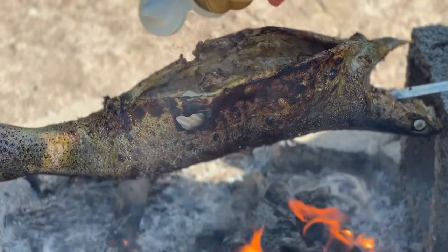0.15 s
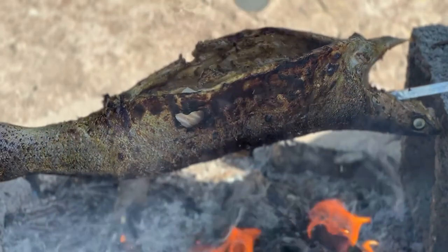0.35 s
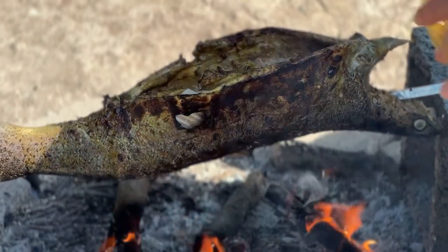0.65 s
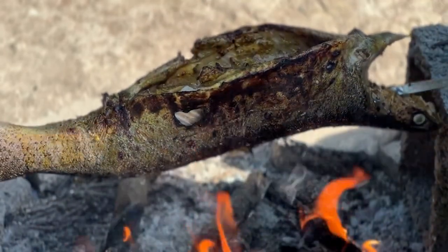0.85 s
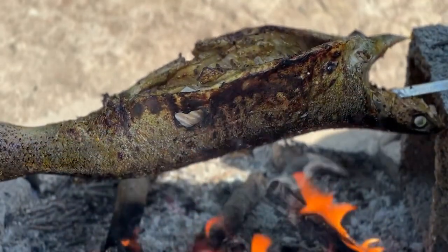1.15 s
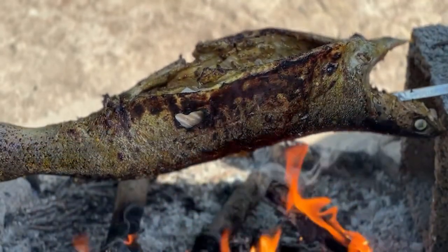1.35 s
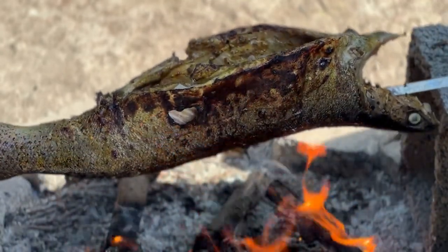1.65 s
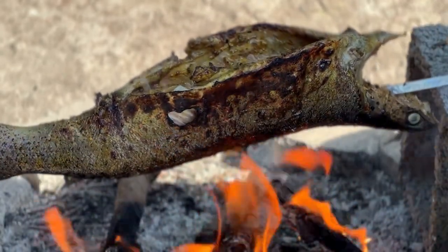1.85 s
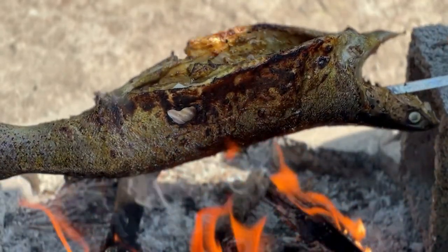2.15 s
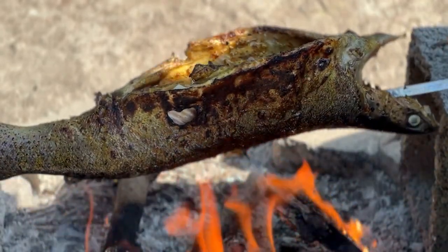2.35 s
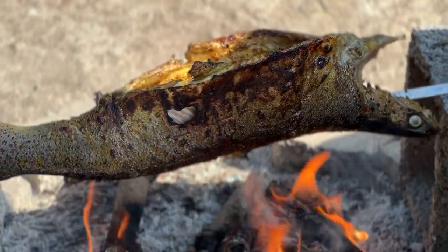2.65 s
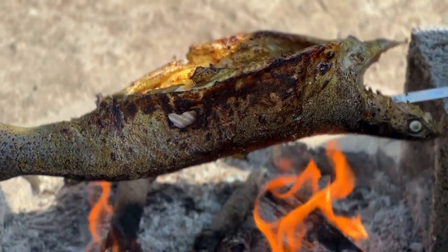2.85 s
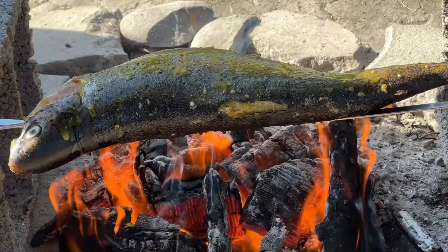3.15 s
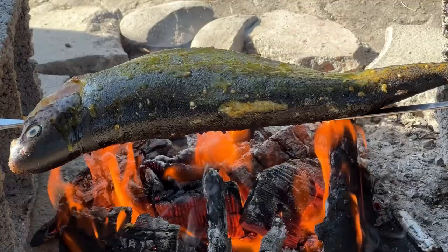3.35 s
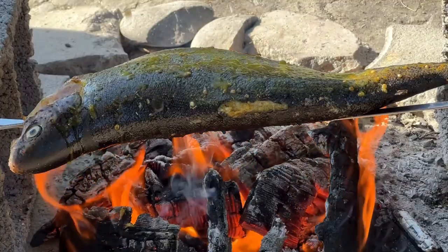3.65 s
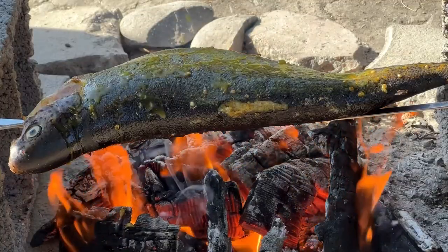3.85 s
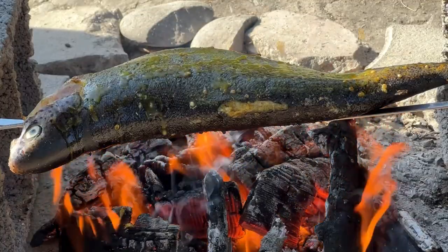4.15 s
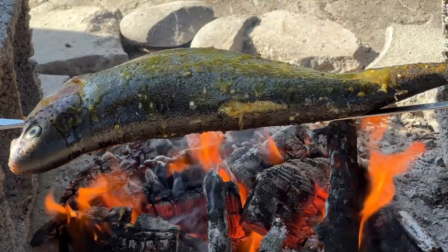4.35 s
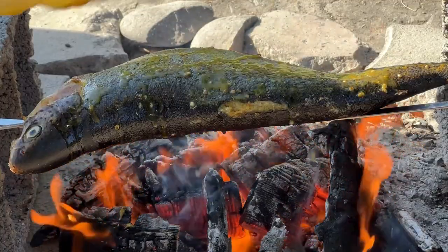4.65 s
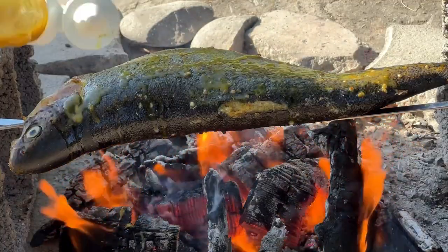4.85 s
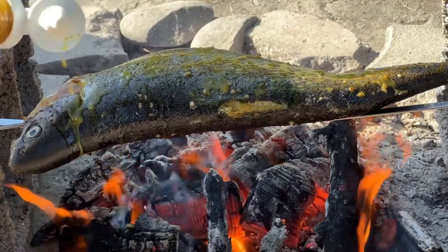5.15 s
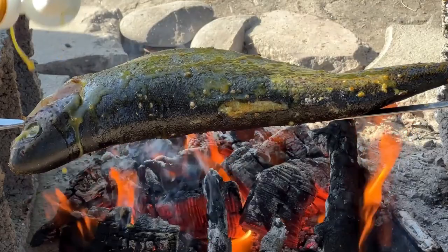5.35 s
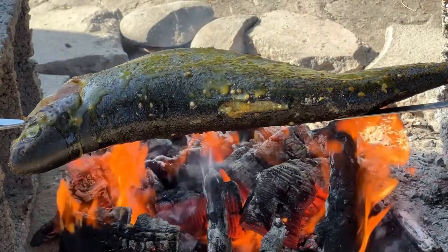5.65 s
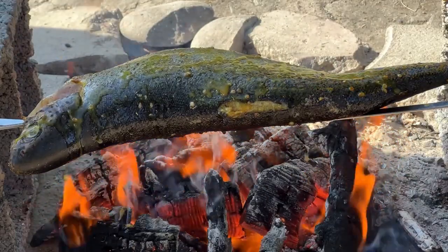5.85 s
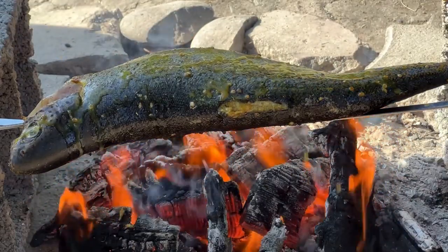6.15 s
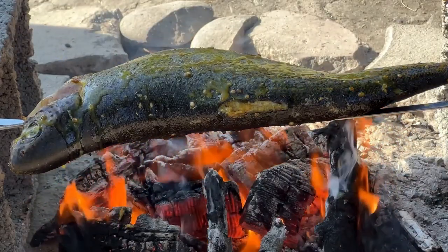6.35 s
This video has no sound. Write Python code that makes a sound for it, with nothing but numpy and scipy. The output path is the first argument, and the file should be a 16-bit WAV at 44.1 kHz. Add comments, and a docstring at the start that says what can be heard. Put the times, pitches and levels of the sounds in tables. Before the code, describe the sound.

Near an open wood fire in a yard, logs pop, sparks snap and embers tick over a low flutter of flame and the light hiss of a roasting fish. Cicadas sing throughout in a shrill, fast-pulsing chorus, one chirping lower beneath the rest. Midway, insects and flames abruptly grow slightly louder and nearer. A bright snap stands out, followed by several short, soft sizzles of dripping oil.

```python
"""Cicadas sing around a yard while a fish roasts over a wood fire. From the start flames rumble, oil
hisses and embers crackle; at once wood pops, a lower cicada chirps and sparks snap. From 0.8 s pockets
of sap and fat burst, and soon the chorus throbs about twelve times a second. At 3.1 s the scene cuts
to a nearer spot, where the chorus is louder. From 4.35 s drips of oil flare on the embers."""
import sys
import numpy as np
from scipy import signal
from scipy.fft import rfft, irfft, next_fast_len
from scipy.io import wavfile
from scipy.ndimage import uniform_filter1d

SR = 44100
rng = np.random.default_rng(int(sys.argv[2]) if len(sys.argv) > 2 else 0)


def inscribe(sig):
    """Save sig as 16-bit PCM at rate SR to the path in sys.argv[1].

    A 1-D sig is mono; a 2-D sig holds one channel per row.
    Samples are clipped to [-1, 1] before scaling.
    """
    pcm = np.round(np.clip(np.atleast_2d(sig).T, -1, 1) * 32767)
    wavfile.write(sys.argv[1], SR, pcm.astype(np.int16))


N = 287091
TIME = np.arange(N) / SR
CUT_S = 3.147


def amp(db):
    """Amplitude ratio of a level in dB."""
    return 10 ** (np.asarray(db) / 20)


def unit_rms(x):
    """Normalisation to an rms of 1."""
    return x / np.sqrt(np.mean(x ** 2) + 1e-20)


def at_hz(points, hz):
    """Interpolation of a spectrum on a logarithmic frequency axis."""
    f, value = np.transpose(points)
    return np.interp(np.log(hz + 1), np.log(f + 1), value)


def contour(rows, column=1):
    """Linear interpolation of one column over time."""
    rows = np.array(rows)
    return np.interp(TIME, rows[:, 0], rows[:, column])


def repeats(runs):
    """Periodic repetition: the time and dB value of each event in evenly spaced runs."""
    return [(s + k * spacing, db) for s, count, spacing, db in runs for k in range(round(count))]


def wander(hz):
    """Random fluctuation of rms 1: superposed sines up to the given rate."""
    rates = np.geomspace(hz / 10, hz, 16)
    return unit_rms(sum(np.sin(2 * np.pi * (f * TIME + rng.random())) / np.sqrt(f) for f in rates))


def ring(modes, t):
    """Free vibration: each mode decays at a rate set by its bandwidth."""
    return sum(amp(db) * np.sin(2 * np.pi * hz * t) * np.exp(-np.pi * width * t)
               for hz, width, db in modes)


def noise_field(gain):
    """Partial coherence: two channels share part of a noise of rms 1, shaped by gain(hz)."""
    # likeness of left and right: f/Hz, correlation
    coherence = [(60, .98), (300, .95), (600, .8), (900, .78), (1300, .92), (2000, .995), (3400, .95),
                 (5500, .93), (6800, .99), (8200, .91), (8900, .8), (9400, .9995), (10650, .9995),
                 (11200, .8), (12400, .86), (13000, .9995), (14150, .9995), (14700, .7)]
    size = next_fast_len(N)
    hz = np.fft.rfftfreq(size, 1 / SR)
    mid, side = rfft(rng.standard_normal((2, size)), axis=1)
    angle = np.arccos(np.clip(at_hz(coherence, hz), 0, 1)) / 2
    mid, side = np.cos(angle) * mid, np.sin(angle) * side
    pair = np.array([mid + side, mid - side])
    return unit_rms(irfft(pair * gain(hz), size, axis=1)[:, :N])


def coloured(spectrum):
    """Spectral shaping: a noise field that follows a table of relative levels."""
    return noise_field(lambda hz: amp(at_hz(spectrum, hz)))


def singers(spectrum, ripple_db=1.3):
    """Superposition: each singer's own pitch leaves a small ridge on the common spectrum."""
    ridge_hz = np.arange(2200) * 10
    ridge_db = ripple_db * unit_rms(uniform_filter1d(rng.standard_normal(2200), size=5))
    return noise_field(lambda hz: amp(at_hz(spectrum, hz) + np.interp(hz, ridge_hz, ridge_db)))


def chorus(dip_s=0.011):
    """Incoherent addition: countless tymbal clicks merge into a hiss that sags as singers pause."""
    # spectra before and after the cut: f/Hz, relative level/dB
    far_spectrum = [(3700, -42.5), (4130, -23), (4600, -10), (5500, -7.5), (6200, -3), (7300, -0.5),
                    (7520, 2.5), (7750, -2), (8300, -5.5), (8600, -10.5), (9300, -25), (10000, -43)]
    near_spectrum = [(3700, -27.5), (4130, -15), (4650, -3), (5700, -1), (6100, 3.5), (6900, 3.5),
                     (7550, 3), (7900, 2.5), (8600, -5), (9300, -15.5), (10000, -93), (11000, -49)]
    # loudness, one list for each side of the cut: t/s, level/dB
    levels = [
        [(0.0, -40), (0.32, -39), (2.77, -38.5), (3.14, -39)],
        [(3.17, -37), (3.85, -35.5), (6.51, -37)],
    ]
    # the loudest singers pause together: first t/s, count, spacing/s, depth/dB
    pauses = [(0.055, 11, 0.069, 0), (0.933, 5, 0.085, 3), (1.355, 5, 0.075, 0.8), (1.926, 7, 0.073, 1.5),
              (2.486, 5, 0.079, 1.5), (2.9, 3, 0.076, 4), (3.215, 4, 0.081, 2), (3.752, 4, 0.079, 2.5),
              (4.093, 9, 0.083, 2), (4.882, 6, .082, 2), (5.455, 3, 0.097, 2.5), (5.75, 4, .07, 1.5),
              (6.08, 3, 0.08, 1.5)]
    sag_db = sum(db * np.exp(-.5 * ((TIME - s) / dip_s) ** 2) for s, db in repeats(pauses))
    far = amp(contour(levels[0])) * singers(far_spectrum)
    near = amp(contour(levels[1])) * singers(near_spectrum)
    return np.where(TIME < CUT_S, far, near) * amp(-sag_db)


def flames(puff_s=0.036):
    """Turbulent combustion radiates a deep rumble with puffs, and a lumpy flutter above it."""
    # strength of the fire: t/s, rumble level/dB, flutter level/dB
    levels = [(0.0, -61, -62), (0.5, -60, -63.5), (0.94, -58, -60), (1.9, -59, -64), (2.5, -61, -63),
              (3.2, -55, -60), (3.45, -57.5, -55.5), (4.1, -54.5, -59.5), (5.0, -52, -51.5),
              (5.2, -55, -56), (5.7, -54, -50.5), (6.51, -54, -53.5)]
    # flame spectra: f/Hz, relative level/dB
    rumble_spectrum = [(15, -25), (30, -8.5), (62, 3.5), (90, -1.5), (130, -8.5), (250, -53)]
    flutter_spectrum = [(60, -21), (110, 1), (160, -0.5), (250, -8), (350, -10), (500, -19.5), (900, -58)]
    # surges of flame: t/s, level/dB
    surges = [(1.37, -54), (2.17, -51.5), (3.04, -49.5), (4.04, -44), (4.13, -45.5), (4.44, -50),
              (5.17, -41.5), (6.13, -43.5), (6.27, -45)]
    puffs = sum(amp(db) * np.exp(-((TIME - s) / puff_s) ** 2) for s, db in surges)
    rumble = np.hypot(amp(contour(levels) + 1.8 * wander(hz=25)), puffs) * coloured(rumble_spectrum)
    flutter = amp(contour(levels, column=2) + 1.5 * wander(hz=90)) * coloured(flutter_spectrum)
    return rumble + flutter


def hiss():
    """Vaporisation: hot sap and oil boil off as a soft wash of steam and a fine fizz."""
    # strength of the boiling: t/s, steam level/dB, fizz level/dB
    levels = [(0.0, -60.5, -52.5), (0.4, -62.5, -54.5), (0.92, -61, -54.5), (1.65, -64.5, -54),
              (2.59, -58, -51.5), (2.96, -60, -53.5), (3.95, -70, -51.5), (4.39, -65, -50.5),
              (4.88, -57, -50), (5.09, -66.5, -53), (5.51, -59, -50), (5.84, -59, -51), (6.11, -69, -49.5),
              (6.51, -53, -45)]
    # boiling spectra: f/Hz, relative level/dB
    steam_spectrum = [(250, -13), (450, -2), (800, 0.5), (1400, -1.5), (2000, 0), (2700, 3), (3600, 0.5),
                      (5000, 4), (8000, -48)]
    fizz_spectrum = [(6000, -25), (8500, 0), (10300, 0), (11500, -2), (13400, 0), (14500, -3), (15500, -6),
                     (15800, -9), (16000, -26)]
    flicker_db = .8 * wander(hz=40)
    steam = amp(contour(levels) + flicker_db) * coloured(steam_spectrum)
    fizz = amp(contour(levels, column=2) + flicker_db) * coloured(fizz_spectrum)
    return steam + fizz


def crackle(ticks_per_s=70, level_db=-46):
    """A Poisson process: faint random impulses ring ten damped pitches; a few stand out."""
    t = np.arange(600) / SR
    ticks = np.zeros(N)
    for hz in np.geomspace(3200, 15000, 10):
        strength = amp(2 * np.minimum(rng.exponential(1, N), 4))
        struck = rng.random(N) < ticks_per_s / 10 / SR
        ticks += signal.oaconvolve(strength * struck, ring([(hz, .3 * hz, 0)], t))[:N]
    return amp(level_db) * ticks


def wood_pops(sag_s=.016, thud_decay_s=.010):
    """Dispersion of bending waves in a log: high pitches arrive first and sweep down into a thud."""
    # wood cracking: t/s, knock level/dB, tick level/dB, thud level/dB, sagging part of the pitch f/Hz
    cracks = [(0.059, -36.5, -36, -39, 278), (0.119, -37.5, -43.5, -50, 315), (0.139, -37, -57, -38, 152),
              (0.212, -36.5, -52, -40, 240), (0.698, -45, -55, -63, 151), (0.766, -34.5, -40, -38, 213),
              (0.969, -34, -30.5, -38, 198), (0.99, -60, -55, -35, 151), (1.062, -44, -56, -37, 149),
              (1.145, -41.5, -56, -63, 187), (1.257, -58, -60, -40, 198), (1.364, -39, -53, -38, 151),
              (1.414, -45, -48, -57, 400), (1.424, -34.5, -30.5, -35, 220), (1.512, -61, -55, -42.5, 150),
              (1.708, -41, -38, -34, 195), (2.467, -61, -36.5, -65, 302), (2.493, -41.5, -39.5, -51, 294),
              (2.542, -45, -39, -38, 144), (2.602, -43, -49, -47, 183), (2.673, -51, -37, -64, 207),
              (2.933, -60, -44.5, -44.5, 230), (3.11, -59, -37, -58, 150), (3.237, -46, -37.5, -46, 220),
              (3.535, -42, -36, -60, 156), (3.608, -42, -48, -41, 245), (3.664, -51, -39.5, -57, 161),
              (3.862, -68, -40, -60, 164), (4.16, -51, -46, -38, 150), (4.227, -42, -41, -47, 156),
              (4.284, -29, -40, -52, 149), (4.457, -57, -39, -39, 177), (4.926, -36, -40.5, -49, 181),
              (4.983, -58, -40, -62, 185), (5.094, -48, -45, -44, 192)]
    # resonances of the tick: f/Hz, bandwidth/Hz, relative level/dB
    tick_modes = [(2380, 920, 4.5), (3400, 470, 2), (4140, 1000, -14)]
    t = np.arange(3000) / SR
    for s, knock_db, tick_db, thud_db, thud_hz in cracks:
        cycles = thud_hz * sag_s * (1 - np.exp(-t / sag_s)) + .55 * np.log(1 + t / .0003)
        knock = amp(knock_db) * (1 - np.exp(-t / .0003)) * np.exp(-t / .0011)
        thud = amp(thud_db) * (1 - np.exp(-(t / .004) ** 2)) * np.exp(-t / thud_decay_s)
        tick = amp(tick_db) * ring(tick_modes, t) * (1 - np.exp(-t / .000096))
        noise = rng.standard_normal(len(t))
        dull_noise = unit_rms(uniform_filter1d(uniform_filter1d(noise, size=10), size=10))
        splinters = amp(knock_db - 15) * dull_noise * np.exp(-t / .006)
        yield s, (knock + thud) * np.sin(2 * np.pi * cycles) + tick + splinters


def low_singer(half_chirp_s=0.04, spread_db=1.3):
    """Resonance: a lower-pitched body filters buzzing chirps, each a little louder or softer."""
    # phrases: middle of first chirp t/s, count, spacing/s, level/dB
    phrases = [(0.14, 5, .155, -52), (0.885, 4, 0.15, -50), (1.485, 6, 0.16, -49), (2.455, 5, 0.16, -49.5),
               (3.26, 1, .16, -44), (3.43, 7, .152, -47.5), (4.52, 5, 0.14, -51), (5.335, 5, 0.13, -48.5),
               (6.02, 3, .16, -49)]
    # body resonances: f/Hz, bandwidth/Hz, relative level/dB
    modes = [(2640, 580, -7), (4420, 380, -0.5), (5200, 910, 3.5), (5164, 70, 6.5)]
    effort = sum(amp(db + spread_db * rng.standard_normal()) * np.exp(-((TIME - s) / half_chirp_s) ** 4)
                 for s, db in repeats(phrases))
    body = lambda hz: sum(amp(db) / (1 + (2 * (hz - f) / width) ** 2) for f, width, db in modes)
    return effort * noise_field(body)


def spark_snaps():
    """Impulse and reflection: a spark's high crack and duller body bounce off the stones."""
    # bursting sparks: t/s, crack level/dB, relative body level/dB
    sparks = [(0.1386, -42, -7), (1.0809, -32, -28), (1.4238, -22, -12.5), (2.0263, -29, -19),
              (2.106, -33, -29), (2.129, -21.5, -31), (2.468, -32, -22), (2.4919, -31.5, -10.5),
              (2.9362, -31, -16), (3.0733, -28, -33), (4.806, -4, -21), (4.9252, -35, -23),
              (5.7693, -31, -15), (6.4693, -23, -18)]
    # resonances of a burst: f/Hz, bandwidth/Hz, relative level/dB
    crack_modes = [(13300, 2000, 0), (10500, 2000, -5), (8000, 1500, -12), (15200, 1800, -6)]
    body_modes = [(2850, 660, 14), (5070, 940, 18), (296, 27, -12)]
    reflections = [(.00055, -13), (.0012, -20), (.0019, -24)]  # delay/s, gain/dB
    t = np.arange(900) / SR
    crack = ring(crack_modes, t) * (1 - np.exp(-(t / .00015) ** 2))
    body = ring(body_modes, t) * (1 - np.exp(-(t / .00045) ** 2))
    for s, db, body_db in sparks:
        direct = crack / abs(crack).max() + amp(body_db) * body
        echoes = sum(amp(gain) * np.interp(t - delay, t, direct, left=0) for delay, gain in reflections)
        yield s, amp(db) * (direct + echoes)


def sap_bursts():
    """Damped oscillation: a bursting pocket and the log ring, rising in pitch, with wet scatter."""
    # pockets of sap and fat: t/s, level/dB, nominal f/Hz, 60 dB decay time/s
    pockets = [(0.791, -45, 970, 0.036), (0.871, -43.5, 1450, 0.028), (0.889, -43, 1430, 0.02),
               (0.97, -29.5, 689, 0.029), (1.109, -48, 820, 0.027), (2.411, -50.5, 1500, 0.047),
               (3.21, -46.5, 778, 0.033), (3.319, -40, 523.5, 0.026), (3.706, -41, 3100, 0.028),
               (3.902, -42.5, 495, 0.034), (3.906, -45, 1590, 0.04), (3.968, -39, 1370, 0.054),
               (4.039, -49.5, 1150, 0.033), (4.282, -33, 1590, 0.017), (4.295, -49, 1430, 0.068),
               (4.364, -39, 1190, 0.034), (4.379, -34.5, 1424, 0.04), (4.527, -41.5, 1254, 0.047),
               (4.998, -38.5, 1260, 0.038), (5.093, -44.5, 1890, 0.032), (5.264, -43, 1280, 0.03),
               (5.264, -43, 480, 0.045), (5.267, -54, 1550, 0.068), (5.848, -44.5, 1160, 0.036)]
    # resonances of the log: nominal f/Hz, relative level/dB
    log_modes = [(1560, -13.5), (1920, -15.5), (2200, -17)]
    # deeper bursts lie further left: f/Hz, left minus right level/dB
    pan = [(600, 2), (1500, -2)]
    t = np.arange(2000) / SR
    glide = 2 * np.pi * t * (.97 + 3 * t)
    log_ring = sum(amp(db) * np.sin(hz * glide) for hz, db in log_modes)
    attack = 1 - np.exp(-t / .0008)
    for s, db, hz, t60 in pockets:
        noise = rng.standard_normal((2, len(t)))
        roughness = 1 + .35 * unit_rms(uniform_filter1d(noise[0], size=60))
        tone = roughness * (np.sin(hz * glide) + log_ring) * amp(-60 * t / t60)
        scatter = amp(-15) * unit_rms(uniform_filter1d(noise[1], size=12)) * np.exp(-t / .016)
        pan_db = at_hz(pan, hz)
        yield s, amp(db) * attack * (tone + scatter) * amp([[pan_db / 2], [-pan_db / 2]])


def oil_flares():
    """Addition of powers: drips of oil flare on the embers in overlapping rushes of steam and fizz."""
    # drips: t/s, rise/s, power decay time/s, steam level/dB, fizz level/dB
    drips = [(4.35, 0.033, 0.053, -59.5, -49), (5.325, .006, 0.18, -63, -51),
             (5.35, 0.025, 0.043, -49.5, -50), (5.62, 0.015, 0.071, -46.5, -56),
             (5.62, .006, 0.067, -56, -45), (5.755, 0.014, 0.16, -80, -44), (5.83, 0.022, 0.26, -52.5, -58),
             (6.15, .012, 0.094, -80, -44)]
    # flare spectra: f/Hz, relative level/dB
    steam_spectrum = [(300, -16), (700, 1.5), (1300, -1), (1600, -7), (2500, 1.5), (3500, 3.5), (4500, -3),
                      (7000, -38)]
    fizz_spectrum = [(6000, -25), (9000, -5), (11000, -4), (12100, 0), (14800, -3), (15600, -6),
                     (16100, -22)]
    power = np.zeros((2, N))
    for s, rise, fall, *levels_db in drips:
        t = np.maximum(TIME - s, 0)
        envelope = np.minimum(t / rise, 1) ** 2 * np.exp(-np.maximum(t - rise, 0) / fall)
        power += amp(levels_db)[:, None] ** 2 * envelope
    steam, fizz = np.sqrt(power)
    return steam * coloured(steam_spectrum) + fizz * coloured(fizz_spectrum)


def scene(onset_delay_s=.001079, fade_in_s=.018):
    """Superposition of insects and fire; the sound drops at the cut and fades straight back in."""
    mix = chorus() + flames() + hiss() + crackle() + low_singer() + oil_flares()
    for s, sound in [*wood_pops(), *spark_snaps(), *sap_bursts()]:
        start = round((s + onset_delay_s) * SR)  # about a millisecond after the listed time
        span = mix[:, start:start + sound.shape[-1]]
        span += sound[..., :span.shape[1]]
    fade_in = np.clip(.022 + (TIME - CUT_S) / fade_in_s, 0, 1)
    return mix * np.where(TIME < CUT_S, 1, fade_in)


def record(dry, threshold_db=-30, recovery_db_per_s=300, cutoff_hz=16550):
    """Phase and level differences between left and right, then compression and a low-pass."""
    # channel balance: f/Hz, left minus right level/dB
    balance = [(30, .3), (150, 1.8), (600, .9), (1500, .1), (3000, 0)]
    # the channels are opposed near 10 kHz and aligned near 13.5 kHz: f/Hz, left minus right phase/rad
    phase_difference = [(2500, 0), (4600, .5), (5300, 0), (5900, -.55), (6600, 0), (7250, -.1),
                        (8600, -1.15), (9450, -3.1), (10600, -3.18), (11400, -4.3), (13000, -6.22),
                        (14150, -6.34), (15500, -8.4), (16300, -8.7)]
    size = next_fast_len(N + 1024)
    hz = np.fft.rfftfreq(size, 1 / SR)
    left = amp(at_hz(balance, hz) / 2) * np.exp(.5j * at_hz(phase_difference, hz))
    stereo = irfft(rfft(dry, size, axis=1) * np.array([left, 1 / left]), size, axis=1)[:, :N]
    power = uniform_filter1d((stereo ** 2).mean(0), size=90, origin=44)
    power_db = 10 * np.log10(abs(power) + 1e-12)
    recovery_db = TIME * recovery_db_per_s
    held_db = np.maximum.accumulate(power_db + recovery_db) - recovery_db
    excess_db = np.maximum(held_db - threshold_db, 0)
    reduction_db = .4 * uniform_filter1d(excess_db, size=200, origin=99)  # acts after the peak has passed
    low_pass = signal.firwin(511, cutoff_hz, window=("kaiser", 9), fs=SR)
    return signal.oaconvolve(stereo / amp(reduction_db), low_pass[None], "same")


dry = scene()
out = record(dry)
inscribe(out)
```